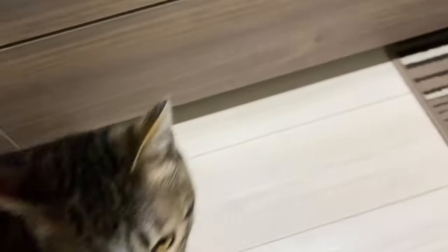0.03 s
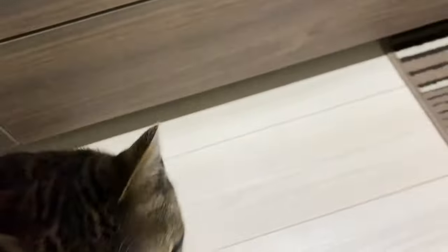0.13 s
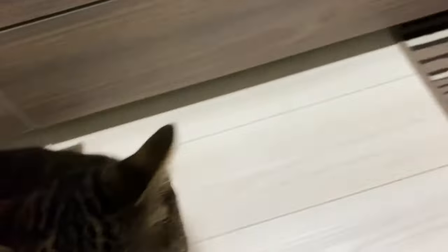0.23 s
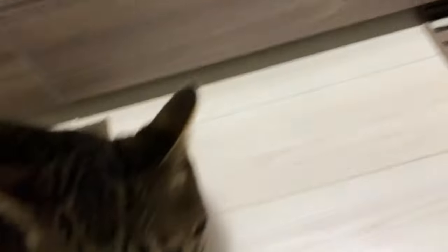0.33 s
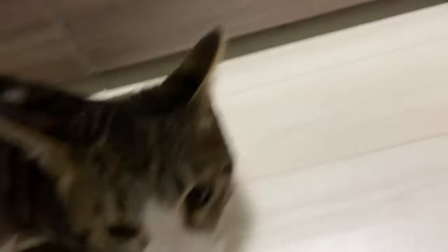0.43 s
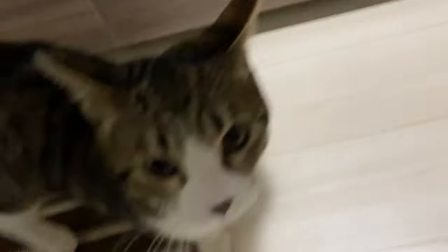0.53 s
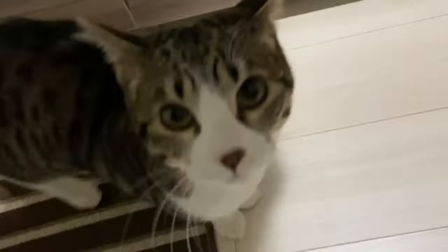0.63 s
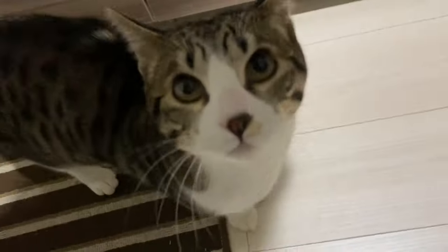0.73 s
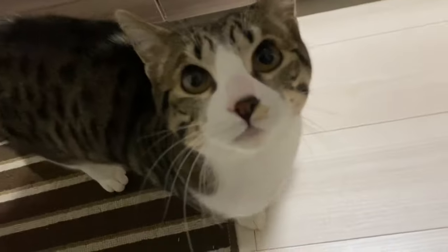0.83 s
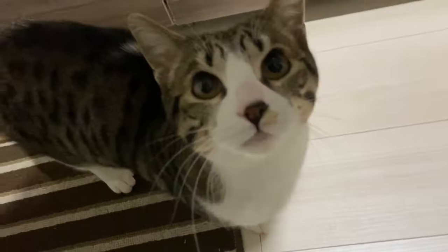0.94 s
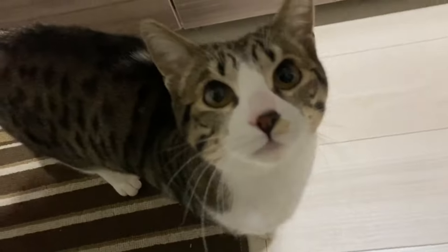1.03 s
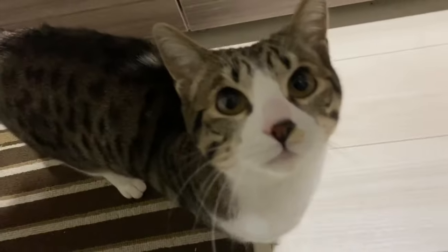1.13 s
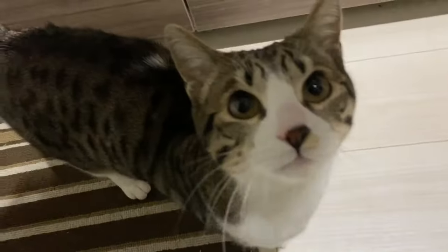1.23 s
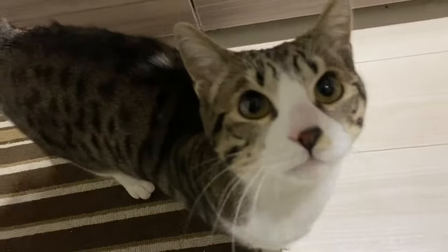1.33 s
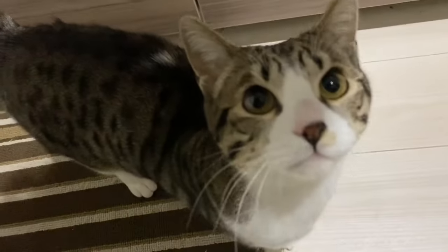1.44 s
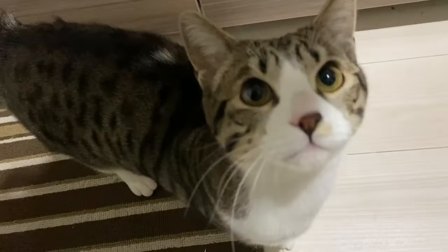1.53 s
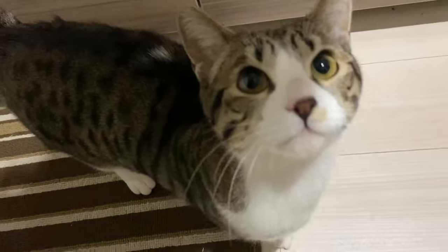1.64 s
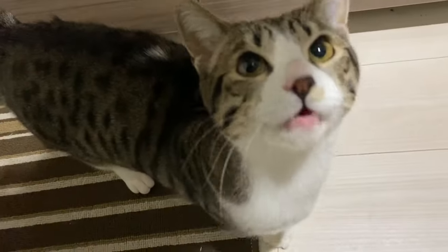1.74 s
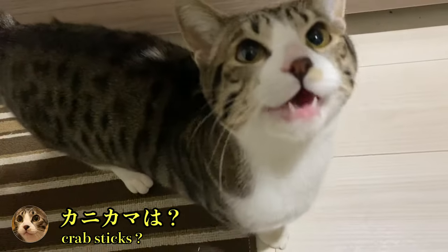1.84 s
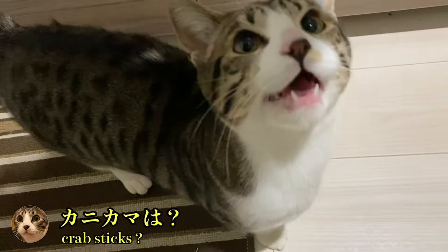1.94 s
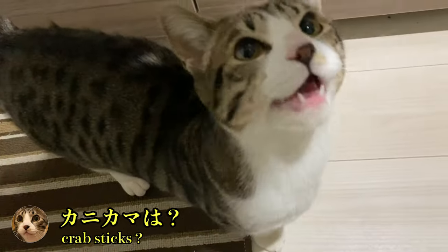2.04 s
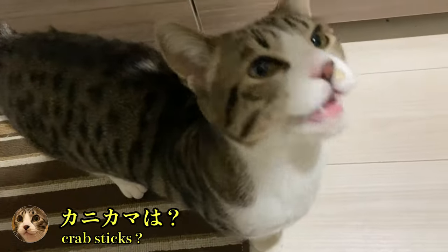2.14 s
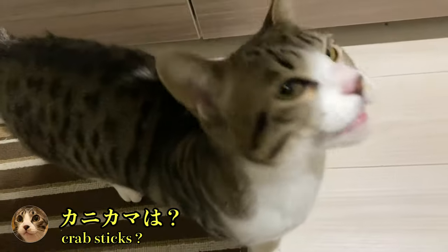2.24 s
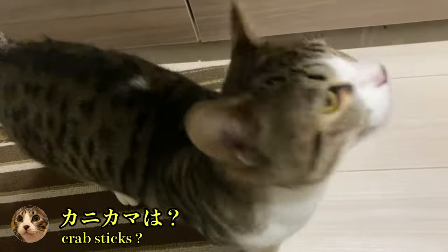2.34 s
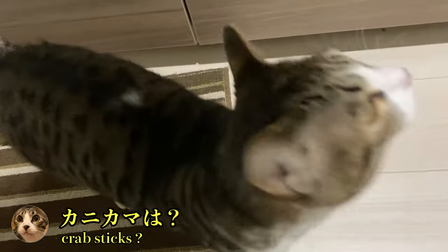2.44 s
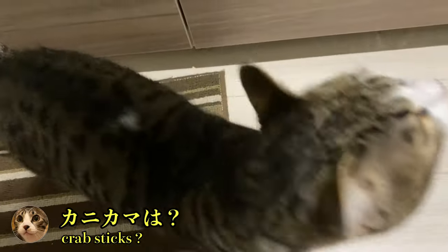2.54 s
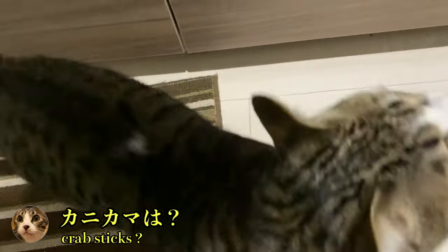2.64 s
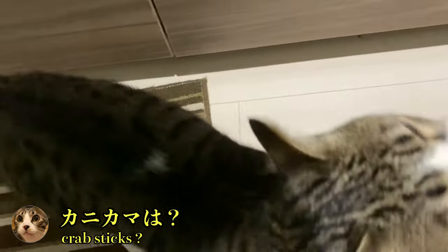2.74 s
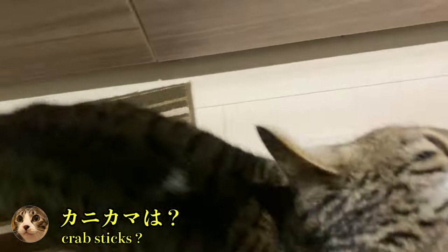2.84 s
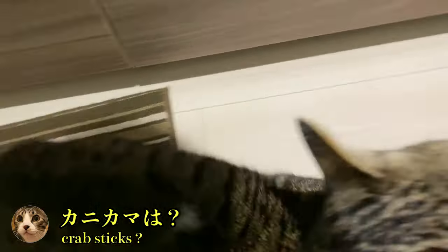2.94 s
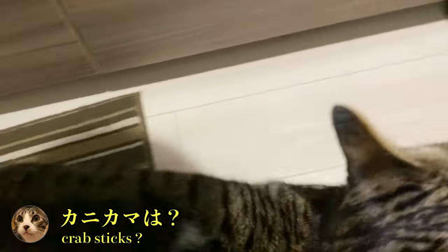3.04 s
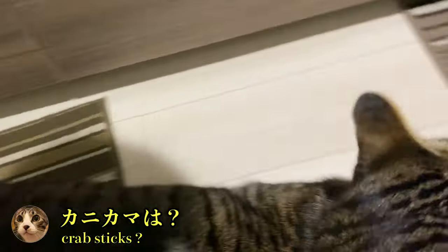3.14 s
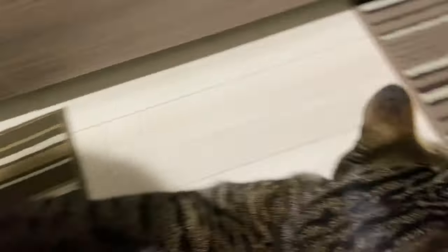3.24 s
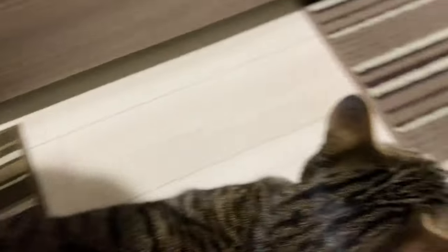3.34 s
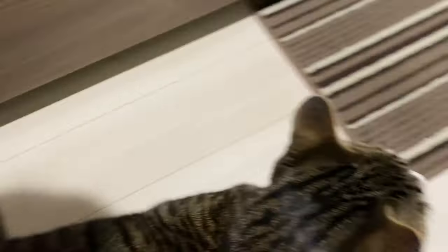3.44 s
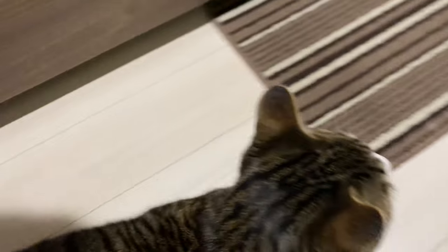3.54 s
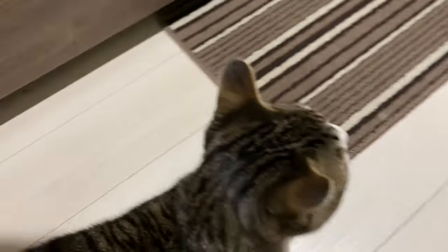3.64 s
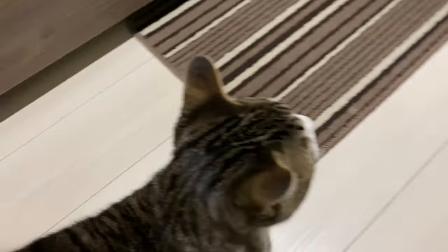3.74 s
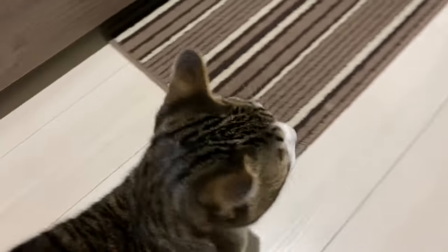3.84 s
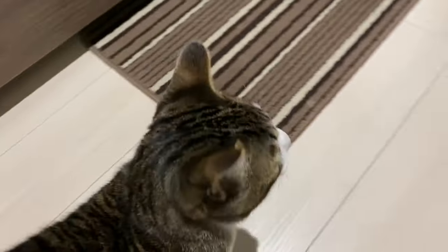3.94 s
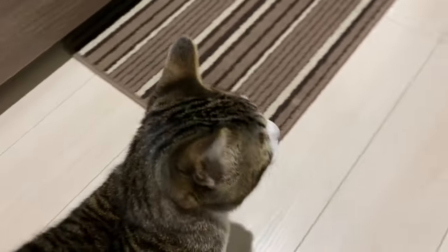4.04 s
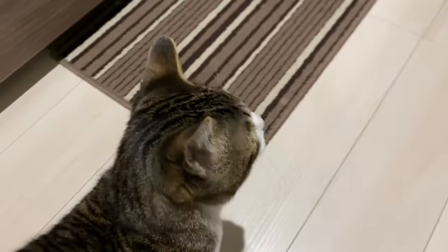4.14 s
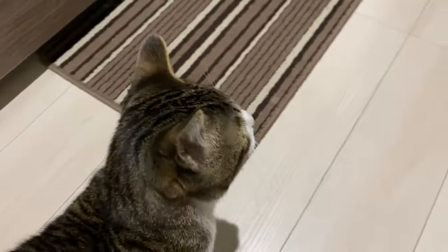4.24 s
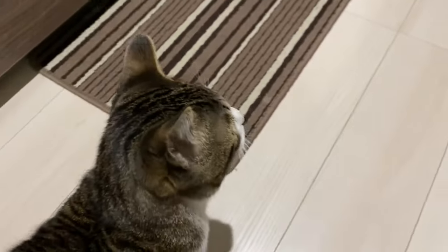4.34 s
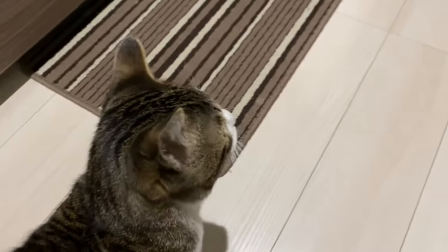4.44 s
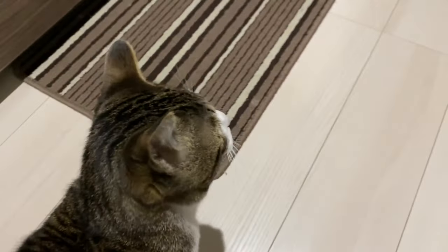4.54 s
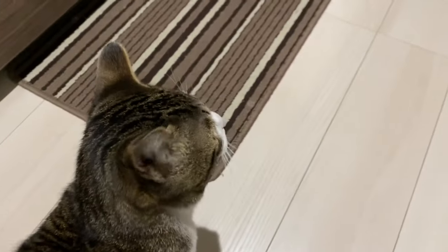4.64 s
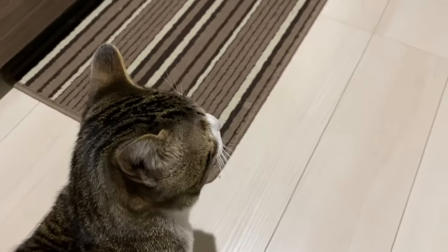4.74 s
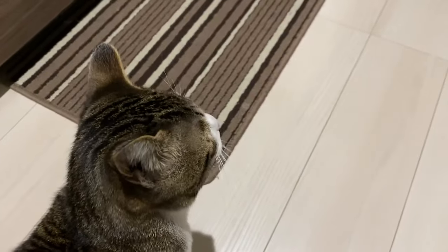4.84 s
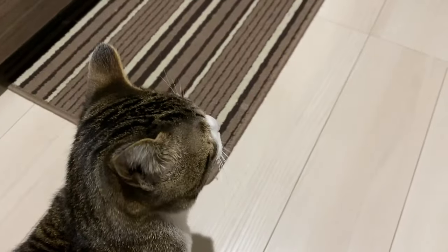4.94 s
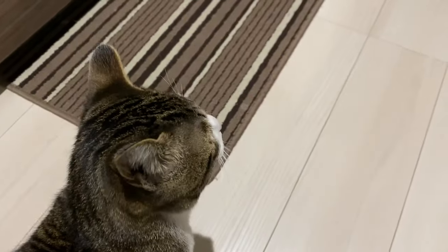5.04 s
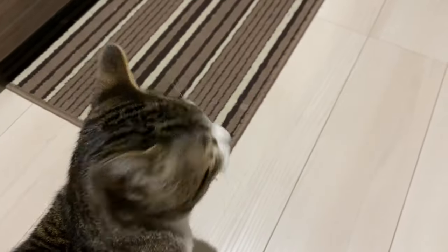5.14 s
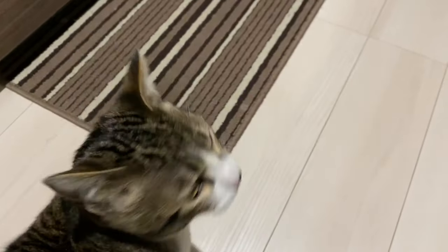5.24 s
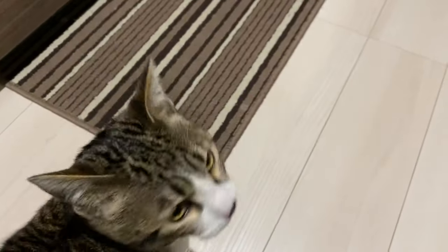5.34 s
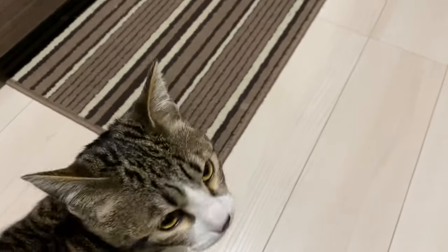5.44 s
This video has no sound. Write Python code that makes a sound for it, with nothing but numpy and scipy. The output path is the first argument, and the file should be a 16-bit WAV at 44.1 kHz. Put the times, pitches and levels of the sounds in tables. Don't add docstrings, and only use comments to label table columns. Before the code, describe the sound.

A cat gives one long, clear, bright meow indoors, then a short creaky closed-mouth murmur, over a low steady hum and soft fan hiss.

```python
import sys
import numpy as np
from scipy import signal
from scipy.fft import rfft, irfft, next_fast_len
from scipy.io import wavfile
from scipy.ndimage import uniform_filter1d

SR = 44100
rng = np.random.default_rng(int(sys.argv[2]) if len(sys.argv) > 2 else 0)


def convert_level_to_amplitude(level_db):
    exponent = np.asarray(level_db, float) / 20
    return 10 ** exponent


def wav_out(sig):
    wavfile.write(sys.argv[1], SR, np.round(np.clip(np.atleast_2d(sig).T, -1, 1) * 32767).astype(np.int16))


N = 241961


def evened(x):
    return x / np.sqrt(np.mean(x ** 2) + 1e-20)


def read(points, hz):
    f, value = np.transpose(points)
    return np.interp(np.log(hz + 1), np.log(f + 1), value)


def envelope(points, t):
    return np.interp(t, *np.transpose(points))


def wander(t, top_hz, count=20):
    coarse = t[::32]
    total = np.zeros(len(coarse))
    for f in np.geomspace(top_hz / 20, top_hz, count):
        total += np.sin(2 * np.pi * (f * coarse + rng.random())) / np.sqrt(f)
    return np.interp(t, coarse, evened(total))


def add(mix, s, sound):
    part = mix[..., round(s * SR):][..., :sound.shape[-1]]
    part += sound[..., :part.shape[-1]]


def throat(modes, hz):
    total = 0
    for k, (f, width, db) in enumerate(modes):
        total = total + (-1) ** k * convert_level_to_amplitude(db) / (1 + 2j * (hz - f) / width) ** 2
    return total


def meow():
    # t/s, level/dB
    effort = [(1.83, -56), (1.838, -38), (1.854, -18), (1.866, -22.5), (2.05, -20), (2.484, -22.5),
              (2.6, -33), (2.736, -34), (2.744, -58)]
    # t/s, f/Hz
    pitch = [(1.83, 693), (2.0, 692.5), (2.2, 660), (2.4, 617.6), (2.5, 622.3), (2.55, 638.6), (2.63, 716),
             (2.67, 787), (2.75, 776)]
    # t/s, pitch lift/%, half length/s
    quivers = [
        (1.8475, 15.5, .007),
        (1.899, 3.8, .012),
        (1.915, -1.15, 0.0149),
        (1.969, 3, .02),
        (2.6, 3.6, 0.0154),
    ]
    # t/s, 0 shut to 1 wide
    opening = [(1.844, 0.5), (1.866, 0.68), (1.902, 0.71), (1.937, 0.727), (2.16, .689), (2.44, 0.49),
               (2.559, 0.43), (2.644, .485), (2.661, 0.094)]
    # t/s, left-right level/dB
    head = [(1.85, 2), (2.0, 2), (2.24, 2), (2.37, -.6), (2.64, -1.5), (2.68, -6)]
    # shut f/Hz, wide f/Hz, width/Hz, shut level/dB, wide level/dB
    jaw = [
        (810, 2497, 225, -0.2, 0),
        (1220, 3540, 510, -18, -7),
    ]
    # f/Hz, width/Hz, level/dB
    open_throat = [(3390, 440, -4), (4800, 1200, -29.5), (7850, 1200, -26), (10500, 1500, -37.5)]

    t = np.arange(effort[0][0], effort[-1][0], 1 / SR)
    effort_db, mouth, pan_db = envelope(effort, t), envelope(opening, t), envelope(head, t)
    lift = sum(percent * np.exp(-((t - s) / half) ** 2) for s, percent, half in quivers)
    hz = uniform_filter1d(envelope(pitch, t) * (1 + lift / 100), size=200)
    turns = np.cumsum(hz * (1 + 0.0025 * wander(t, 60))) / SR

    modes = [(1002, 303, -7.2)]
    for shut_hz, wide_hz, width, shut_db, wide_db in jaw:
        modes.append((shut_hz + (wide_hz - shut_hz) * mouth, width, shut_db + (wide_db - shut_db) * mouth))

    low = [convert_level_to_amplitude(effort_db) * sum(abs(throat([mode], k * hz)) for mode in modes) for k in range(1, 5)]
    low[0] = low[0] * convert_level_to_amplitude(1.5 - 7 * np.exp(-((t - 2.19) / 0.14) ** 2))
    voice = np.zeros(len(t))
    for k, gain in enumerate(low, start=1):
        voice += gain * convert_level_to_amplitude(.7 * wander(t, 39.94)) * np.sin(2 * np.pi * k * turns)

    teeth = (4890 + 2150 * (t - t[0]), 900, -24 - 300 * np.maximum(t - 2.42, 0))
    shine_s = 2.027
    shine = convert_level_to_amplitude(-np.maximum(54 * (shine_s - t), 14 * (t - shine_s)))
    flare = convert_level_to_amplitude(8 * np.exp(-((t - 1.885) / .035) ** 2))
    for k in range(5, 17):
        gain = shine * abs(throat(open_throat, k * hz)) + abs(throat([teeth], k * hz))
        gain = gain * low[3] * (flare if k > 6 else 1)
        shimmer = convert_level_to_amplitude(min(1.1 * (k - 4), 4.2) * wander(t, 29.9))
        voice += gain * shimmer * np.sin(2 * np.pi * (k * turns + rng.random()))

    breath_band = signal.butter(2, [1500, 6000], "bandpass", fs=SR)
    breath = evened(signal.lfilter(*breath_band, rng.standard_normal(len(t))))
    call = np.sqrt(2) * voice + low[2] * convert_level_to_amplitude(-37) * breath
    return t[0], call * signal.windows.tukey(len(t), .015) * convert_level_to_amplitude(np.outer([.5, -.5], pan_db))


def shut(hz):
    # f/Hz, width/Hz, level/dB
    shut_throat = [(320, 105, 10), (660, 430, 5), (1285, 245, 3.5), (1690, 150, -1.5), (4170, 380, -20)]
    nose_hz, nose_width_hz = 1030, 420
    return throat(shut_throat, hz) * (1 - 0.69 / (1 + (2 * (hz - nose_hz) / nose_width_hz) ** 2))


def murmur():
    # t/s, pitch f/Hz, level/dB
    course = [(2.765, 287, -49), (2.79, 303, -36.5), (2.82, 336.8, -31.5), (2.844, 354, -30.5),
              (2.873, 352.8, -30), (2.93, 266.8, -32.5), (2.976, 202.5, -34), (2.995, 200, -40),
              (3.05, 195, -47)]
    s, *columns = np.transpose(course)
    t = np.arange(s[0], s[-1], 1 / SR)
    hz, effort_db = (uniform_filter1d(np.interp(t, s, c), size=300) for c in columns)

    slack = np.clip((t - 2.85) / .135, 0, 1)
    creak = .08 + (.56 - .08) * slack
    chest_db = -2.5 + (12 + 2.5) * slack
    turns = np.cumsum(hz * (1 + 0.12 * creak * wander(t, 150))) / SR

    voice = convert_level_to_amplitude(chest_db) * np.sin(2 * np.pi * turns)
    for k in range(2, 16):
        voice += (convert_level_to_amplitude(1.2 * wander(t, 40)) * shut(k * hz) * np.exp(2j * np.pi * k * turns)).real

    puffs = (0.35 + np.exp(-(turns % 1) / 0.22)) * rng.standard_normal(len(t))
    puffs = irfft(rfft(puffs) * shut(np.fft.rfftfreq(len(t), 1 / SR)), len(t))
    voice += (0.14 + 2.2 * creak) * evened(puffs)
    voice *= convert_level_to_amplitude(5.6 * creak * wander(t, 130))
    voice /= np.sqrt(uniform_filter1d(voice ** 2, size=1500) + 1e-9)
    sound = convert_level_to_amplitude(effort_db) * voice * signal.windows.tukey(len(t), .1)
    return s[0], sound * convert_level_to_amplitude(np.array([[1.5], [-1.5]]))


def ticks():
    # t/s, peak level/dB, f/Hz, t60/s
    clicks = [
        (1.7994, -35, 3050, .015),
        (1.813, -35, 3030, .02),
        (3.588, -39, 14000, .0015),
        (3.589, -39, 10500, .0015),
        (3.5915, -42, 13000, .002),
    ]
    # t/s, peak level/dB, f/Hz, t60/s
    knocks = [
        (.575, -46, 1100, 0.079),
        (.659, -34, 690, 0.11),
        (.662, -34, 1100, 0.075),
        (.672, -37, 890, 0.047),
        (.735, -35, 660, 0.099),
        (.783, -35.5, 710, 0.11),
        (.844, -36, 660, 0.1),
        (1.037, -38, 723, 0.16),
    ]
    out, t = np.zeros((2, N)), np.arange(3000) / SR
    for s, db, hz, t60 in clicks:
        add(out, s, convert_level_to_amplitude(db - 60 * t / t60) * np.sin(2 * np.pi * hz * t))
    soft_onset = np.minimum(t / 0.0053, 1)
    for s, db, hz, t60 in knocks:
        add(out, s, convert_level_to_amplitude(db - 60 * t / t60) * soft_onset * np.sin(2 * np.pi * hz * t))
    return out


def room(x):
    t60_s, length = 0.25, SR // 2
    taps = np.zeros((2, length))
    at = np.arange(120, length - 20, 20)
    at = at + rng.integers(0, 20, (2, len(at)))
    np.put_along_axis(taps, at, rng.choice([-1., 1.], at.shape), 1)
    tail = signal.lfilter([1], [1, -.5], taps * convert_level_to_amplitude(-60 * np.arange(length) / SR / t60_s))
    return signal.fftconvolve(x[None], tail / np.linalg.norm(tail[0]), axes=1)[:, :N]


def ports(x, shift):
    size = next_fast_len(N)
    lead = read(shift, np.fft.rfftfreq(size, 1 / SR))
    return np.array([x[0], irfft(rfft(x[1], size) * np.exp(1j * lead), size)[:N]])


def compressor():
    # f/Hz, rms level/dB, waver/dB
    hum = [(40, -51, 3), (81.5, -45.5, -3), (100.35, -33.5, -0.9), (200, -57, 2)]
    # t/s, level/dB
    hum_swell = [(0.0, -33.5), (0.69, -31.5), (1.07, -33.5), (1.53, -31.5), (2.09, -32.5), (2.28, -32.5),
                 (2.77, -31.5), (3.51, -34), (3.77, -33), (4.4, -35.5), (4.94, -32.5), (5.49, -34.5)]
    t = np.arange(N) / SR
    swell_db = envelope(hum_swell, t)
    tones = np.zeros(N)
    for hz, db, waver_db in hum:
        tones += convert_level_to_amplitude(db + waver_db * wander(t, 4)) * np.sin(2 * np.pi * (hz * t + rng.random()))
    return np.sqrt(2) * tones * convert_level_to_amplitude(swell_db - swell_db.mean())


def thrum():
    # t/s, peak level/dB
    gusts = [(0.01, -38), (.36, -37), (.5, -43), (.73, -40), (.82, -36.5), (1.7, -41), (1.99, -38),
             (2.37, -39.5), (2.92, -36), (3.17, -42.5), (3.44, -43.5), (3.59, -42), (3.68, -40),
             (3.96, -41.5), (4.5, -43), (4.67, -45), (4.83, -44), (5.16, -41), (5.33, -42.5)]
    rise_db_per_s, fall_db_per_s, calm_db = 71, 200, -49
    t = np.arange(N) / SR
    turns = np.cumsum(151.7 + 5.03 * wander(t, 25)) / SR
    gusts_db = [db - np.maximum(rise_db_per_s * (s - t), fall_db_per_s * (t - s)) for s, db in gusts]
    level_db = np.maximum(np.max(gusts_db, axis=0), calm_db) + 2.4 * wander(t, 30)
    return np.sqrt(2) * convert_level_to_amplitude(level_db) * np.sin(2 * np.pi * turns)


def noise(spectrum, level_db, drift_db, size=1024, patchy_db=1.5, bands=()):
    # f/Hz, likeness 0-1
    likeness = [(30, .995), (60, .985), (150, .95), (330, .85), (520, .3), (800, .15), (1500, .25),
                (2300, .4), (3000, .45), (4500, .4), (5600, .15), (7000, .4), (8400, .7), (9500, .88),
                (11000, .92)]
    # f/Hz, lead/rad
    port_lead = [(40, 0), (350, -.35), (800, -1.5), (1500, .8), (2200, 0), (3000, -1.1), (4600, -.6),
                 (5600, 0), (7000, .8), (8450, 3.14), (10200, 6.28), (12000, 9.42), (13900, 12.56),
                 (15600, 15.7)]
    # f/Hz, left-right level/dB
    lean = [(40, 0), (300, .2), (700, 2), (1300, .4), (2100, 2.6), (4700, 3), (5400, 6.2), (7000, 3.4),
            (8300, .4), (15000, 0)]
    hop, hz = size // 4, np.fft.rfftfreq(size, 1 / SR)
    inside = (hz >= spectrum[0][0]) & (hz <= spectrum[-1][0])
    hz, frames = hz[inside], N // hop + 5
    a, b, c, d, patches = rng.standard_normal((frames, len(hz), 5)).T
    patches = uniform_filter1d(patches, size=8, axis=0)
    patches = evened(uniform_filter1d(patches, size=10, axis=1))

    same = np.clip(read(likeness, hz), 0, 1)[:, None]
    left, own = a + 1j * b, c + 1j * d
    right = same * np.exp(1j * read(port_lead, hz))[:, None] * left + np.sqrt(1 - same ** 2) * own
    pair = np.array([left, right]) * convert_level_to_amplitude(np.multiply.outer([.5, -.5], read(lean, hz)))[:, :, None]

    colour_db = read(spectrum, hz)
    for f, width, db in bands:
        colour_db = colour_db + db / (1 + (2 * (hz - f) / width) ** 2)
    z = np.zeros((2, len(inside), frames), complex)
    z[:, inside] = pair * convert_level_to_amplitude(colour_db[:, None] + patchy_db * patches)
    sound = signal.istft(z, nperseg=size, noverlap=size - hop)[1][:, :N]
    return convert_level_to_amplitude(level_db + drift_db) * evened(sound)


def fan():
    # f/Hz, level per Hz/dB
    rumble_colour = [(25, -33), (40, -12.5), (52, -6), (64, -16.5), (75, 0.5), (95, -9.5), (122, -6.5),
                     (140, -3.5), (165, -7), (180, -20.5), (215, -9), (270, -10.5), (320, -18),
                     (400, -19.5)]
    # f/Hz, level per Hz/dB
    hiss_colour = [(210, -28), (350, -13.5), (422, 0), (467, -7), (516, -2.5), (600, -11), (647, -0.5),
                   (842, -4.5), (1070, -4.5), (1540, -9), (1640, -9), (2020, -9), (2870, -9), (5120, -13.5),
                   (7000, -22), (9100, -56), (15400, -120)]
    # f/Hz, level per Hz/dB
    air_colour = [(7000, -7), (7500, -1.5), (8200, -1.5), (9300, 2.5), (10000, -4.5), (11000, -7.5),
                  (12000, -8), (13000, -15.5), (14000, -16), (14800, -15), (15400, -13)]
    # f/Hz, width/Hz, level/dB
    duct = [(425.3, 15.4, 4.5), (690, 82, 4.5), (1386, 38, 5.5), (1650, 41, 6.5), (2936, 250, 3.5)]
    # t/s, level/dB
    drift = [(0, 0.6), (1.4, 0.55), (2.1, 1.7), (3.5, 0), (4.2, -0.65), (5.49, -0.3)]
    hiss_db = envelope(drift, np.arange(N) / SR)
    rumble = noise(rumble_colour, -44.5, 2.56, size=4096, patchy_db=2.34)
    hiss = noise(hiss_colour, -41, hiss_db, size=2048, patchy_db=1.44, bands=duct)
    air = noise(air_colour, -57, .5 * hiss_db, patchy_db=1.5)
    return rumble + hiss + air


def scene():
    # f/Hz, lead/rad
    facing_shift = [(600, -.2), (1400, -.3), (2000, -.55), (2600, -1.5), (3500, -1.2), (5600, 0),
                    (7000, .8), (8450, 3.14), (10200, 6.28), (12000, 9.42), (13900, 12.56), (15600, 15.7)]
    # f/Hz, lead/rad
    turned_shift = [(200, -.6), (350, -.7), (680, -1.9), (1000, -1.6), (1400, -1.1), (4000, -1)]
    # f/Hz, lead/rad
    machine_shift = [(30, -.12), (100, -0.32), (200, -0.48)]
    facing, turned = ticks(), np.zeros((2, N))
    add(facing, *meow())
    add(turned, *murmur())
    cat = ports(facing, facing_shift) + ports(turned, turned_shift)
    echoes = convert_level_to_amplitude(-14) * room((facing + turned).mean(0))
    machines = np.tile(compressor() + thrum(), (2, 1))
    return cat + echoes + ports(machines, machine_shift) + fan()


def band_limit(x):
    return signal.sosfilt(signal.butter(12, 15390, fs=SR, output="sos"), x)


def record(dry):
    return band_limit(dry)


dry = scene()
out = record(dry)
wav_out(out)
```